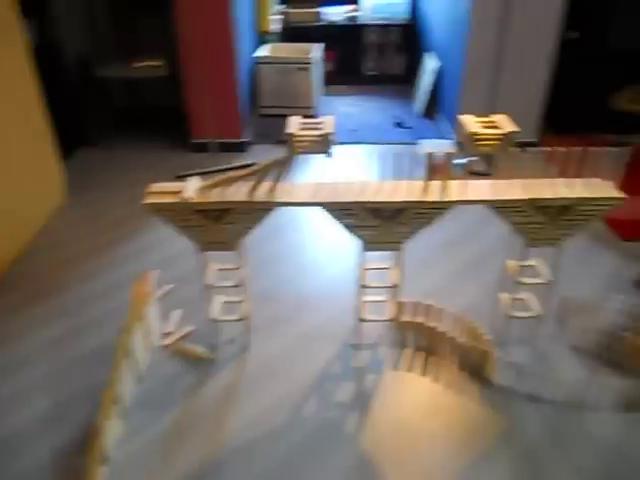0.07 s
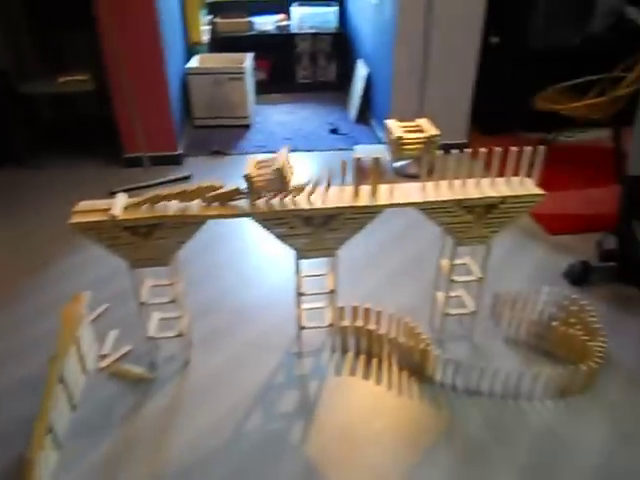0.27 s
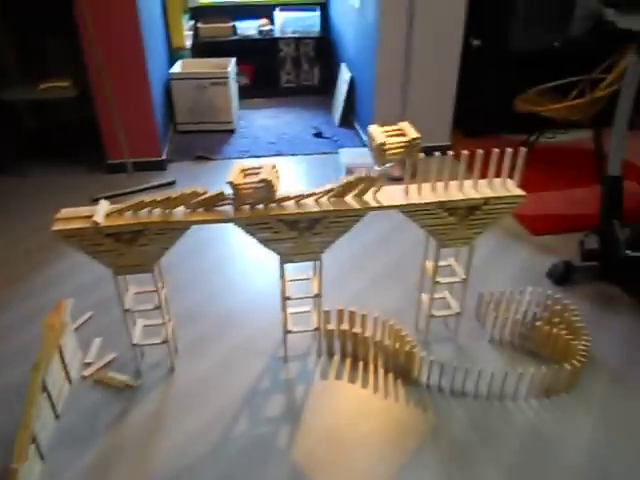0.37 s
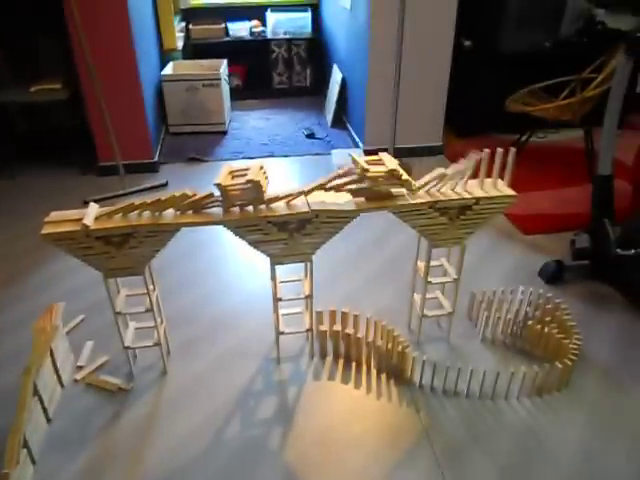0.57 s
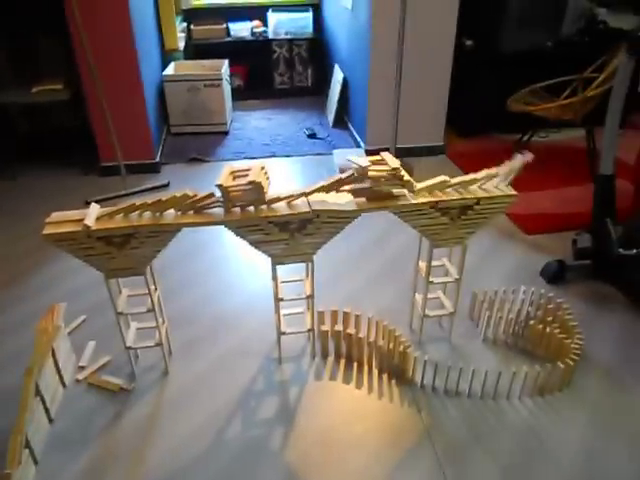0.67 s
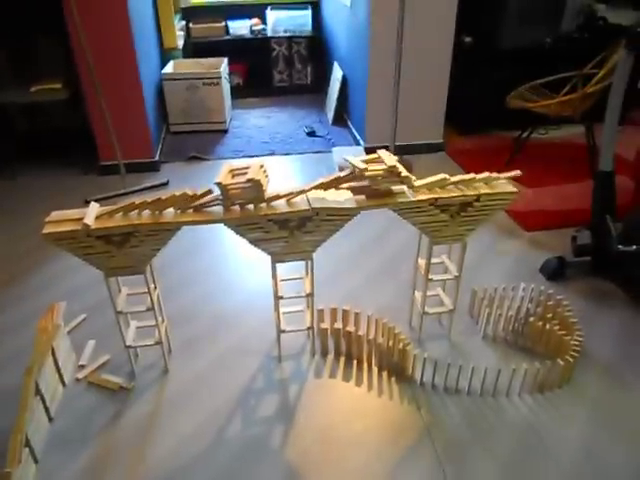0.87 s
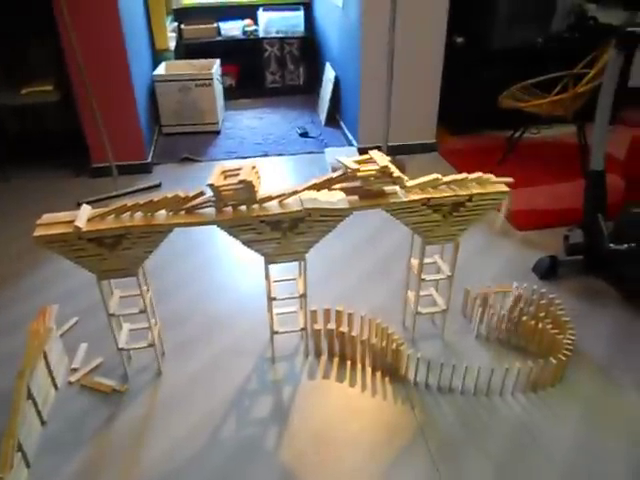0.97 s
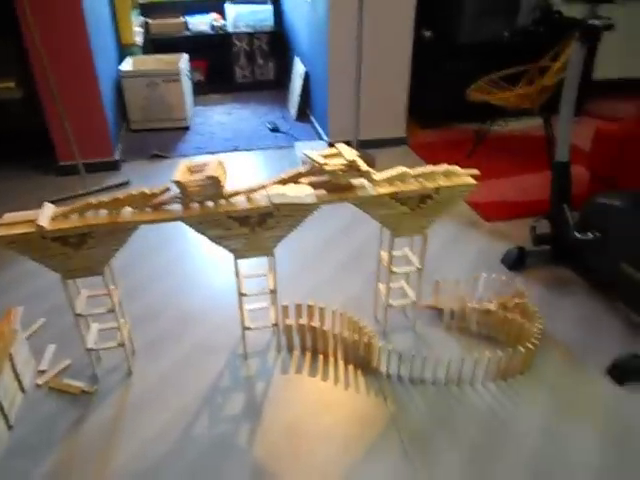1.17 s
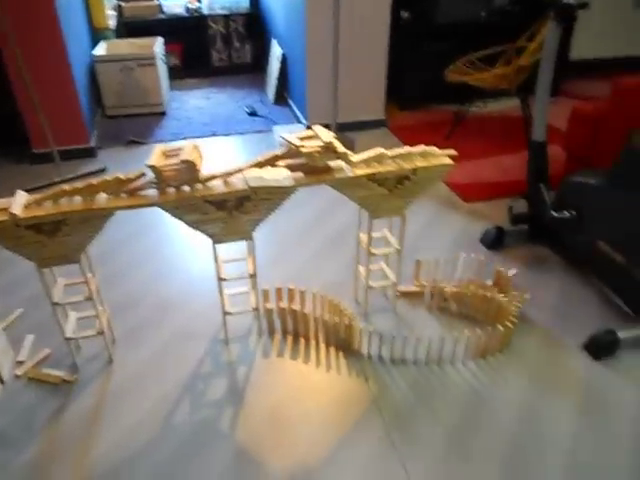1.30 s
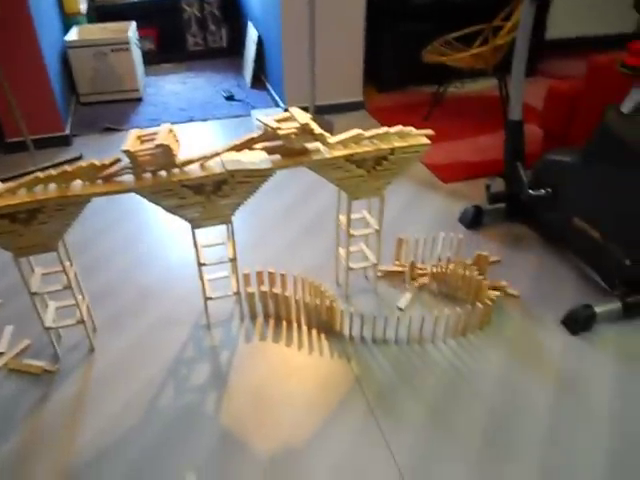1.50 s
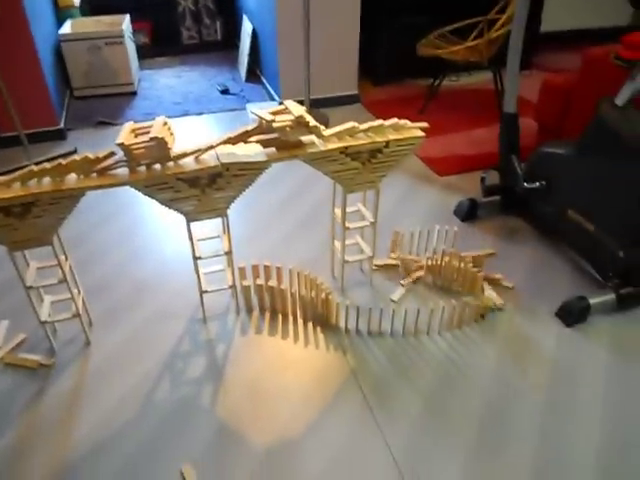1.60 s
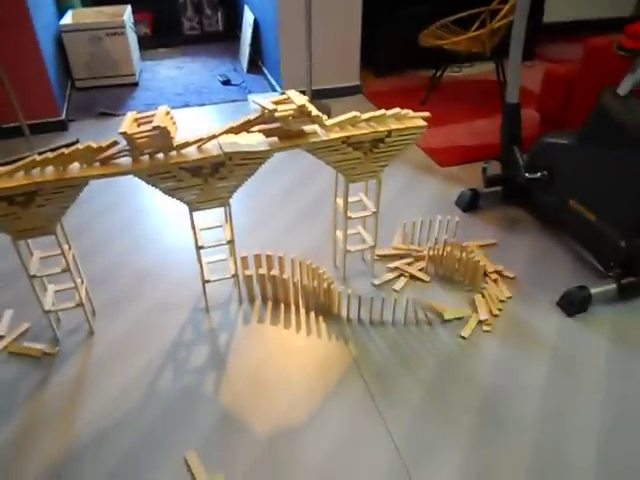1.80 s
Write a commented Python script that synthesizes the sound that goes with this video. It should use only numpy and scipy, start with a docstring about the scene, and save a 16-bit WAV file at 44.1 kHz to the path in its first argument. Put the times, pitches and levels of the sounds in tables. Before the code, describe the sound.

A clatter of little wooden blocks falling one after another in an echoing room.

```python
"""Indoors in a live room, one microphone, far enough off to hear the walls answer every blow.
Over faint room noise and a fading hum, small wooden planks start to rattle, then topple in a chain
along a plank bridge: each blow is a crack, the plank's ringing modes and a knock on the deck beneath.
From 0.9 s they drop onto the hard floor, the heaviest with a dull thud. Near the end a last stack
collapses in a rattle of small contacts."""
import sys
import numpy as np
from scipy import signal
from scipy.fft import rfft, irfft
from scipy.io import wavfile
from scipy.ndimage import uniform_filter1d, minimum_filter1d

SR = 44100
rng = np.random.default_rng(int(sys.argv[2]) if len(sys.argv) > 2 else 0)


def master(y):
    """Save y as 16-bit WAV."""
    cut = np.clip(np.atleast_2d(y).T, -1, 1)
    pcm = np.round(cut * 32767)  # scale
    wavfile.write(sys.argv[1], SR, pcm.astype(np.int16))


N = 81585

# Blows up on the bridge. Each row: start in seconds, crack in dB, bending mode in Hz, its level in dB,
# upper mode in Hz, its level in dB, knock in dB. Levels in all tables are relative.
BRIDGE_BLOWS = [(.0268,-20.5,2900,-20.5,6620,-24,-24), (.147,-21.5,2650,-21.5,6600,-20.5,-26.5),
                (.2045,-18,2730,-16.5,6600,-16,-22), (.2302,0.5,3130,-4,6320,-1.5,-12),
                (.2333,2.5,3056,-5,8100,-3.5,-15), (.2528,-2.5,2900,-22,5770,-7,-9),
                (.272,-1.5,2940,-24,7280,-2,-29), (.289,-6.5,3040,-22,6540,-8,-17),
                (.3845,-9,3060,-29,6380,-11,-15.5), (.401,-14,2500,-14.5,6229,-9.5,-17),
                (.4495,-2.5,2950,-21,7650,-6,-18.5), (.4985,-6,2850,-9,7800,-15,-24),
                (.5125,-3,2930,-14,8000,-3,-30), (.517,-1.5,2870,-35,6900,-3.5,-13),
                (.553,-20,2950,-13,6100,-19,-18), (.601,-11,2780,-23,6110,-14,-22),
                (.622,-15,2850,-23,7060,-30,-16.5), (.6895,-12,2830,-25,7080,-24,-32),
                (.715,-8,2830,-20,7270,-17,-20.5), (.788,-12.5,2850,-26,7270,-20,-23.5)]
# Planks landing down on the floor. Each row: as for a bridge blow, without the knock.
FLOOR_LANDINGS = [(0.916,-21,2930,-7,7450,-18), (.9225,-16.5,2930,-10,6330,-26),
                  (.947,-25,2850,-10.5,7690,-18.5), (0.9652,-17,2887,-8.5,6480,-20),
                  (0.9696,-14,2955,-12.5,7620,-16), (0.9994,-15.5,2824,-16,7980,-19),
                  (1.066,-22,2952,-9.5,6630,-17.5), (1.0695,-12.5,2830,-31,7990,-9),
                  (1.1335,-10,2720,-15,7100,-21), (1.1502,-4,2810,-18,7740,-1.5),
                  (1.157,-9.5,2792,-5,7180,-8.5), (1.172,-13,2797,-6.5,7480,-14),
                  (1.184,-7,2780,-15,6960,-24), (1.329,-14.5,2910,-30,6930,-37),
                  (1.3483,-13.5,3150,-41,6670,-21), (1.356,-15.5,2850,-19,5370,-31.5),
                  (1.4613,-47,3000,-40,6870,-29), (1.4788,-26.5,3300,-35,7900,-28.5),
                  (1.4834,-21,3110,-42,6650,-43), (1.497,-29,2620,-44,6900,-37),
                  (1.505,-31,2540,-30.5,6310,-20.5), (1.529,-40,2670,-40,6100,-25.5),
                  (1.5998,-16.5,2705,-28,6550,-30), (1.6326,-20,2606,-23,6480,-34),
                  (1.685,-15.5,2500,-38,6970,-17), (1.69,-18,2564,-20.5,8370,-17),
                  (1.724,-16.5,2500,-18.5,6200,-27), (1.766,-15,2415,-24,7200,-39),
                  (1.7812,-15.5,2850,-21,5900,-42)]
# Stacks collapsing. Each row: start and length in seconds, then crack, bending mode, upper mode,
# knock and level change over the length, all in dB.
COLLAPSES = [(0,0.13,-41,-46,-38,-34,-13), (0.203,0.029,-28,-24,-27,-23,-1.5),
             (.255,0.062,-6,-15,-10,-18,-8), (.39,0.12,-17.5,-24.5,-22,-21.5,-4.5),
             (0.519,.125,-29.5,-22,-23,-31,-1.5), (0.64,.1,-37,-30,-29.5,-42,6),
             (1.639,0.22,-35,-34.5,-47,-38.5,5.5)]
# Heavy hits that shake the floor. Each row: start in seconds, level in dB.
THUDS = [(0.256, 7), (0.916, 4), (.965, -4), (1.1331, -3.5)]
# A plank's bending and upper mode groups. Each row: frequency ratio, level in dB.
BEND_MODES = [(0.998, -0.5), (1.158, -11)]
UPPER_MODES = [(0.899, -12), (0.949, -7.5), (1, -3.5), (1.048, -11.5)]
# Modes of the bridge deck. Each row: frequency in Hz before DECK_TUNING, level in dB.
DECK_MODES = [(760, -2.5), (885, -2.5), (1060, 1), (1222, 2), (1405, -2)]
# Tone colours of crack, knock, thud and room noise. Each row: frequency in Hz, gain in dB.
CRACK_COLOUR = [(70, -35), (900, -22.5), (3000, 0.5), (4500, 0.5), (8000, -0.5), (10500, -9.5),
                (11700, -22.5), (12500, -42)]
KNOCK_COLOUR = [(100, -24), (650, -12.5), (820, -4), (3000, -.5), (8000, -37)]
THUD_COLOUR = [(60, -29.5), (285, -1.5), (2100, 2), (5000, -45)]
AIR_COLOUR = [(25, 6.5), (60, -7), (300, 2), (1000, -2.5), (2800, 6), (10000, -10.5), (13000, -33)]
# The room's tail at the microphone. Each row: band centre in Hz, T60 in seconds, level in dB.
ROOM_BANDS = [(188, 0.23, -1), (746, 0.77, 1.5), (2500, 0.35, -0.5), (5500, 0.41, -0.5), (9240, 0.3, -2),
              (12900, 0.26, -16)]

CRACK_DB, BEND_DB, UPPER_DB, KNOCK_DB = 13.5, 7.5, 12, 21
CRACK_T60_S, BEND_T60_S, UPPER_T60_S, KNOCK_T60_S = 0.0068, 0.057, 0.033, 0.073
ATTACK_S = 0.00016
CHATTER_DB, CHATTER_T60_S = -8.5, 0.051  # a softer, longer tail trails each crack
WOBBLE_DEPTH, WOBBLE_S = 0.0068, 0.01  # planks pressing on each other shift the modes as they ring
STRIKE_SCATTER_DB = 2  # where a piece is struck decides which modes ring most
CONTACTS_PER_S, CONTACT_SCATTER_DB = 160, 3.5
BEND_HZ, BEND_SPREAD, UPPER_HZ, UPPER_SPREAD = 2850, 0.0453, 6900, 0.106
DECK_DB, DECK_T60_S, DECK_TUNING = 4.5, 0.046, 0.99
FLOOR_KNOCK_DB, THUD_T60_S = -19.5, 0.043
ROOM_DB, ROOM_BUILD_S = -1, 0.0015
AIR_DB, HUM_HZ, HUM_DB, HUM_FADE_DB_PER_S = -52, 197, -60, -8
CEILING, LIMITER_S, RELEASE_DB_PER_S, TOP_HZ = 0.72, 0.001, 352, 12200


def planks(contacts):
    """Right at the wood: every contact cracks, rings the plank and knocks on what lies beneath."""
    t = np.arange(SR // 10) / SR
    cracks, rings, knocks = np.zeros((3, N))
    rise = 1 - np.exp(-t / ATTACK_S)
    snap = rise * (fade(t, CRACK_T60_S) + undb(CHATTER_DB) * fade(t, CHATTER_T60_S))
    knock, bend, upper = (rise * fade(t, t60) for t60 in (KNOCK_T60_S, BEND_T60_S, UPPER_T60_S))
    for start, crack_db, bend_hz, bend_db, upper_hz, upper_db, knock_db in contacts:
        crack_noise, knock_noise = rng.standard_normal((2, len(t)))
        add(cracks, start, undb(crack_db + CRACK_DB) * unit(crack_noise * snap))
        add(knocks, start, undb(knock_db + KNOCK_DB) * unit(knock_noise * knock))
        add(rings, start, undb(bend_db + BEND_DB) * ring(bend_hz, BEND_MODES, bend))
        add(rings, start, undb(upper_db + UPPER_DB) * ring(upper_hz, UPPER_MODES, upper[:len(t) // 2]))
    return rings + colour(cracks, CRACK_COLOUR) + colour(knocks, KNOCK_COLOUR)


def ring(tuning, modes, envelope):
    """Struck wood rings in a group of modes, scaled by tuning, each wobbling a little in pitch."""
    pitches, db = np.array(modes).T
    size = int(WOBBLE_S * SR) + 1
    noise = rng.standard_normal((len(modes), len(envelope)))
    wobble = uniform_filter1d(noise, size, axis=1) * np.sqrt(size)
    hz = tuning * pitches[:, None] * (1 + WOBBLE_DEPTH * wobble)
    cycles = np.cumsum(hz, axis=1) / SR + rng.random((len(modes), 1))
    gains = undb(db + STRIKE_SCATTER_DB * rng.standard_normal(len(modes)))
    return unit(gains @ np.sin(2 * np.pi * cycles) * envelope)


def rattle():
    """Collapsing stacks make many small, uneven contacts, given as rows like BRIDGE_BLOWS."""
    contacts = []
    for start, length, crack_db, bend_db, upper_db, knock_db, change_db in COLLAPSES:
        for k, (jitter, force, bend, upper) in enumerate(rng.standard_normal((128, 4))):
            age = (k + np.tanh(jitter) / 2 + .5) / CONTACTS_PER_S
            if age < length:
                db = change_db * age / length + CONTACT_SCATTER_DB * force
                bend_hz = BEND_HZ * np.exp(BEND_SPREAD * bend)
                upper_hz = UPPER_HZ * np.exp(UPPER_SPREAD * upper)
                contacts.append((start + age, crack_db + db, bend_hz, bend_db + db,
                                 upper_hz, upper_db + db, knock_db + db))
    return contacts


def bridge_deck(contacts):
    """Up on the bridge: contacts before the first floor landing ring the deck."""
    t, out = np.arange(SR // 10) / SR, np.zeros(N)
    envelope = (1 - np.exp(-t / ATTACK_S)) * fade(t, DECK_T60_S)
    for start, *_, knock_db in contacts:
        if start < FLOOR_LANDINGS[0][0]:
            add(out, start, undb(knock_db + DECK_DB) * ring(DECK_TUNING, DECK_MODES, envelope))
    return out


def floor_thuds():
    """Down at the floor: the heaviest hits shake it with a dull thud."""
    t, out = np.arange(SR // 10) / SR, np.zeros(N)
    for start, db in THUDS:
        add(out, start, undb(db) * unit(rng.standard_normal(len(t)) * fade(t, THUD_T60_S)))
    return colour(out, THUD_COLOUR)


def room_response():
    """From one spot to the microphone: direct sound, then a diffuse tail, longest in the low mids."""
    t = np.arange(SR // 2) / SR
    spectrum = np.exp(2j * np.pi * rng.random(len(t) // 2 + 1)) * np.sqrt(len(t))
    log_hz = np.log(np.maximum(np.arange(len(spectrum)) * SR / len(t), 1))
    centres = np.log([row[0] for row in ROOM_BANDS])
    build = 1 - np.exp(-t / ROOM_BUILD_S)
    response = signal.unit_impulse(len(t))
    for share, (_, t60, db) in zip(np.eye(len(ROOM_BANDS)), ROOM_BANDS):
        band = irfft(spectrum * np.interp(log_hz, centres, share), len(t))
        response += undb(ROOM_DB + db) * band * unit(fade(t, t60) * build)
    return response


def room_tone():
    """Behind everything: faint room noise and a low hum that fades."""
    t = np.arange(N) / SR
    air = colour(rng.standard_normal(N), AIR_COLOUR)
    hum = np.sin(2 * np.pi * HUM_HZ * t) * undb(HUM_DB + HUM_FADE_DB_PER_S * t)
    return undb(AIR_DB) * air / np.std(air) + hum


def undb(db):
    """Decibels to amplitude."""
    return 10 ** (np.asarray(db) / 20)


def fade(t, t60):
    """Falls 60 dB in t60 seconds."""
    return np.exp(-np.log(1000) * t / t60)


def unit(x):
    """Scales to an energy of one."""
    return x / np.sqrt(np.sum(x ** 2))


def colour(x, points, size=4096):
    """Minimum-phase filter through (Hz, dB) points."""
    hz, db = np.array(points).T
    bin_hz = np.maximum(np.arange(size // 2 + 1) * SR / size, 1)
    gain = undb(np.interp(np.log(bin_hz), np.log(hz), db))
    cepstrum = irfft(np.log(gain))
    cepstrum[1:size // 2] *= 2  # folding onto positive time makes it causal
    cepstrum[size // 2 + 1:] = 0
    return signal.oaconvolve(x, irfft(np.exp(rfft(cepstrum))))[:len(x)]


def add(out, start, x):
    """Mixes x in at start seconds."""
    i = min(max(int(start * SR), 0), N)
    out[i:i + len(x)] += x[:N - i]


def scene(spots=4):
    """At the microphone, in mono: planks fall at several spots and the room answers each differently."""
    out = room_tone()
    # in dB, the floor's knock grows half as fast as the crack
    landings = [(*row, FLOOR_KNOCK_DB + row[1] / 2) for row in FLOOR_LANDINGS]
    contacts = list(BRIDGE_BLOWS) + landings + rattle()
    for spot in range(spots):
        here = contacts[spot::spots]
        wood = planks(here) + bridge_deck(here)
        if spot == 0:
            wood += floor_thuds()
        out += signal.fftconvolve(wood, room_response())[:N]
    return out[None]


def record(dry):
    """After the microphone: a fast limiter holds the loudest cracks down, then the top is cut."""
    size = int(LIMITER_S * SR)
    over_db = 20 * np.log10(np.maximum(np.abs(dry) / CEILING, 1))
    release_db = RELEASE_DB_PER_S * np.arange(N) / SR
    held_db = np.maximum.accumulate(over_db + release_db, axis=-1) - release_db
    gain = uniform_filter1d(minimum_filter1d(undb(-held_db), size), size)
    lowpass = signal.ellip(8, .2, 70, TOP_HZ, fs=SR, output="sos")
    return signal.sosfilt(lowpass, dry * gain)


dry = scene()
out = record(dry)
master(out)
```